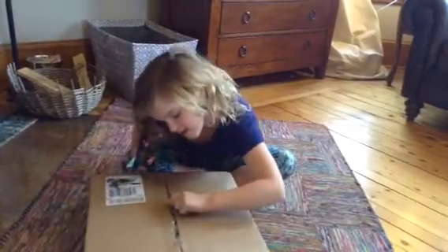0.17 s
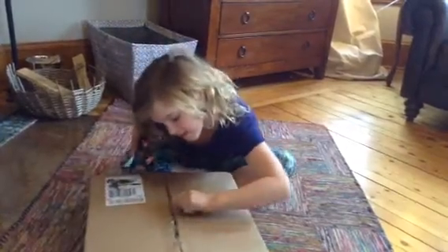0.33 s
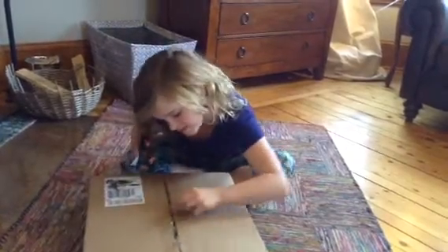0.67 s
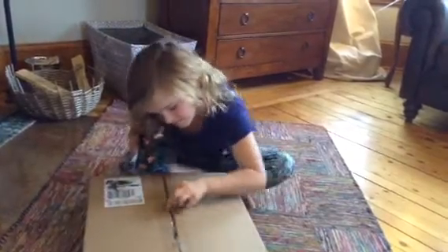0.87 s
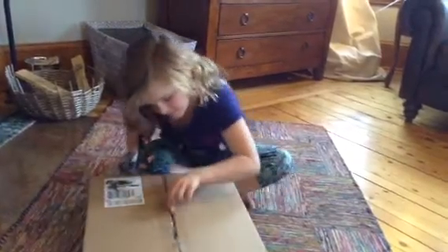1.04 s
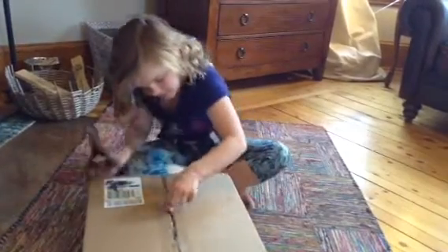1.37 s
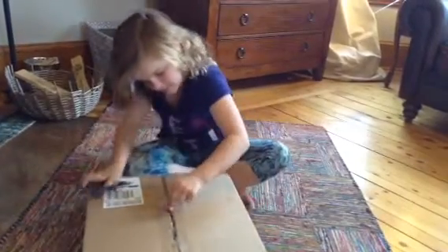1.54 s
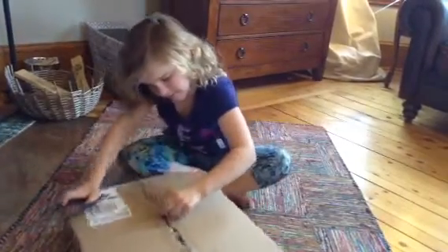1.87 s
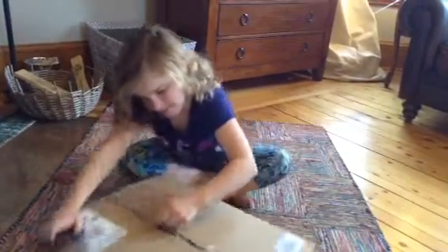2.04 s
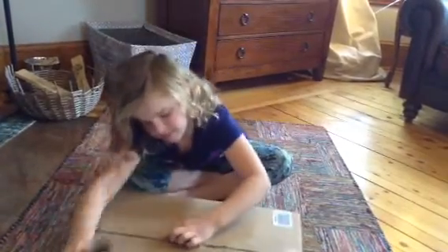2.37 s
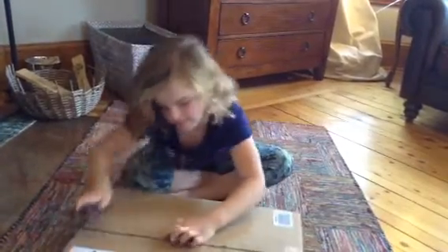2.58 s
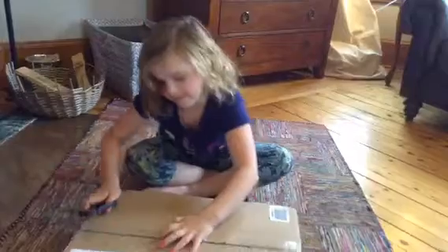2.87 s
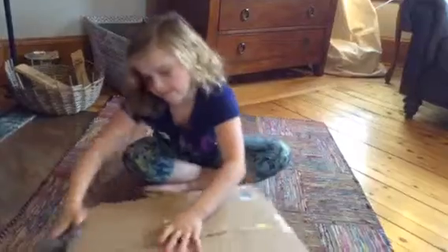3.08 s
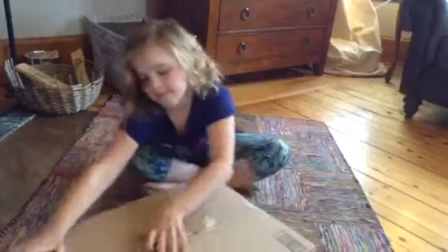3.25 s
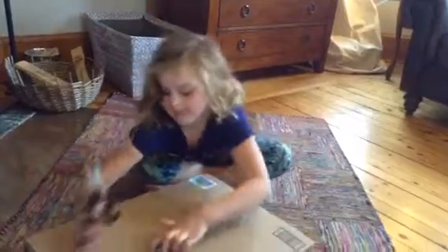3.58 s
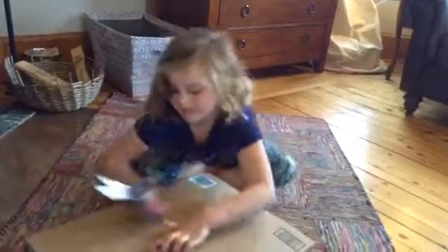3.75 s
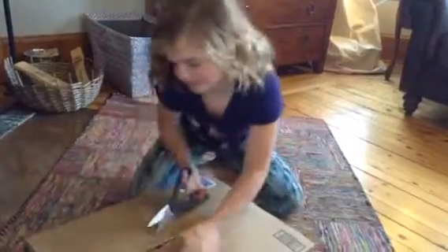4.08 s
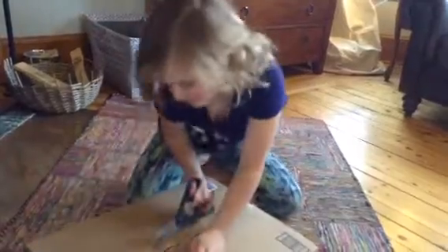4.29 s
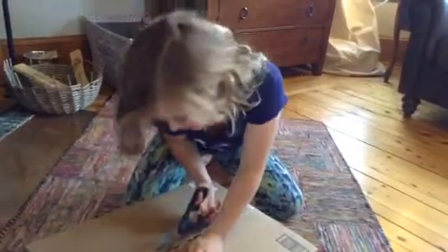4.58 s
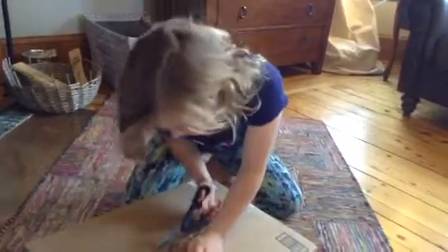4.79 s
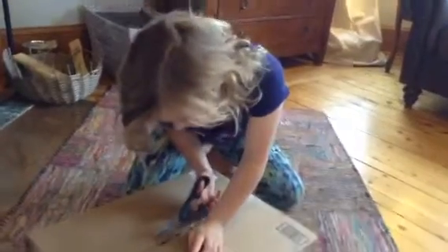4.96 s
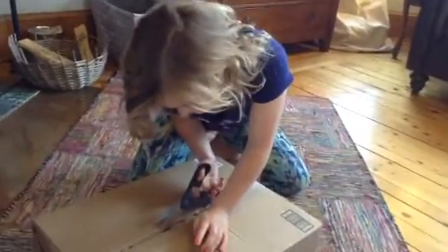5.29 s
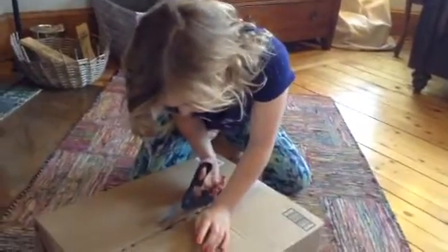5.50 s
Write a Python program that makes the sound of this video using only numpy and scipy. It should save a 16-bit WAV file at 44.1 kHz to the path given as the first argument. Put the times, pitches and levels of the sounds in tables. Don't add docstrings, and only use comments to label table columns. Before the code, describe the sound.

A faint, steady low hum lies under a quiet living room, heard close in mono with a short room tail. From 0 to 0.5 s fingers brush card, with thin bright tape snaps, the strongest near 0.38 s. Small ticks follow at 1.05-1.3 s. Hollow cardboard knocks at 1.5-1.7 s start a long hissing, scraping drag over the rug, fullest around 2 s, fading by 2.5 s. A cluster of bumps, a tiny squeak and a snap come at 2.6-2.7 s. A second drag swells from 2.9 to 3.8 s, dipping with a snap near 3.5 s. At 3.93 s comes the loudest event, a sharp crack with a boxy thump, then duller knocks, a faint squeak and short rubs until 4.3 s. From 4.4 s scissors make irregular dry ticks and crisp tape snaps, strong at 4.62 s, with a hollow knock at 4.89 s, ending on a bright snap and brief rub near 5.58 s.

```python
import sys
import numpy as np
from scipy import signal
from scipy.io import wavfile
from scipy.ndimage import uniform_filter1d

SR = 44100
rng = np.random.default_rng(int(sys.argv[2]) if len(sys.argv) > 2 else 0)


def makeup_ratio(level_db):
    decades = np.asarray(level_db, float) / 20
    return 10 ** decades


def master(y):
    cut = np.clip(np.atleast_2d(y).T, -1, 1)
    pcm = np.round(cut * 32767)
    wavfile.write(sys.argv[1], SR, pcm.astype(np.int16))


N = 248283


def rms_one(x):
    return x / np.sqrt(np.mean(x ** 2) + 1e-20)


def drift(rate_hz):
    hop = 40
    r = np.exp(-2 * np.pi * rate_hz * hop / SR)
    settle = 2000
    noise = rng.standard_normal(N // hop + 2 + settle)
    slow = signal.lfilter([1], [1, -2 * r, r * r], noise)[settle:]
    return np.interp(np.arange(N) / hop, np.arange(len(slow)), rms_one(slow))


def ring(push, hz, t60):
    r = makeup_ratio(-60 / (t60 * SR))
    w = 2 * np.pi * hz / SR
    return signal.lfilter([0, np.sin(w)], [1, -2 * r * np.cos(w), r * r], push + 1e-18)


def band(x, low_hz, high_hz, order=2):
    edges = [low_hz, min(high_hz, SR / 2.2)]
    return signal.sosfilt(signal.butter(order, edges, "band", fs=SR, output="sos"), x)


def coloured(sources, spectrum, patchy_db):
    hz, db = np.transpose(spectrum)
    bands = int(3 * np.log2(hz[-1] / hz[0])) + 1
    edges = np.geomspace(hz[0], hz[-1], bands + 1)
    out = np.zeros(N)
    for k, (low, high) in enumerate(zip(edges, edges[1:])):
        level_db = np.interp(np.log(low * high) / 2, np.log(hz), db)
        flicker_db = patchy_db * drift(13.3)
        out += makeup_ratio(level_db + flicker_db) * band(sources[k % 2], low, high)
    return rms_one(out)


def room_hum():
    # frequency in Hz, level in dB.
    hum_spectrum = [(20, -39), (45, -28), (75, -13.5), (148, -12.5), (190, 2.5), (300, -4.5), (370, -18),
                    (540, -22), (780, -35), (1150, -28), (1310, -23), (1500, -32), (4000, -33),
                    (15900, -62)]
    return makeup_ratio(-56) * coloured(rng.standard_normal((2, N)), hum_spectrum, patchy_db=0.44)


def contacts():
    # time in seconds, speed as hiss in dB,
    # weight as scrape in dB re hiss.
    pulls = [
        [(1.3, -73, 8), (1.46, -54, -9.5), (1.62, -63, -0.5), (1.74, -50, -2), (1.95, -39, -5.5),
         (2.33, -43, -2), (2.38, -50.5, -2), (2.5, -54, -5), (2.58, -68, 4)],
        [(2.84, -70, 2.5), (2.96, -44, -6), (3.1, -41, -6), (3.3, -41, -4.5), (3.46, -51, -5.5),
         (3.6, -41.5, -14.5), (3.68, -37.5, -13), (3.75, -40, -12), (3.81, -56, -2)],
        [(4.04, -86, -7), (4.13, -51, 0.5), (4.22, -47.5, -2.5), (4.41, -53.5, 1.3), (4.47, -64, 4.5),
         (4.52, -55.5, 2), (4.6, -56, -0.5), (4.7, -63.5, 4), (4.84, -74, 6.5)],
    ]
    # full strength at in seconds, held in seconds, hiss in dB,
    # weight in dB re hiss.
    brushes = [(0, 0.0032, -54.5, -2.5), (.31, 0.058, -49, -13), (.44, 0.083, -57.5, -5.5),
               (.885, 0.037, -56, -12.5), (1.06, .015, -66, 3.5), (2.59, 0.068, -61.5, 3),
               (3.83, 0.13, -61.5, -1.5), (5.31, 0.082, -66, -2)]
    # time in seconds, held in seconds, hiss in dB,
    # weight in dB re hiss, settling in dB per second.
    jolts = [(.359, 0.04, -48, -0.5, 180), (2.704, 0.017, -40, -14, 280), (2.705, 0.028, -58, 13, 114),
             (3.933, .004, -47, 2.5, 92), (4.893, .004, -66.5, 12, 49), (5.579, .06, -52.5, 2, 100)]
    t = np.arange(N) / SR
    for pull in pulls:
        s, db, weight_db = np.transpose(pull)
        yield np.interp(t, s, db, left=-120, right=-120), np.interp(t, s, weight_db)
    strokes = [(*row, 230, 286) for row in brushes] + [(*row, 2500) for row in jolts]
    for s, held, db, weight_db, fall, rise in strokes:
        before_s = np.maximum(s - t, 0)
        after_s = np.maximum(t - s - held, 0)
        yield np.maximum(db - rise * before_s - fall * after_s, -150), weight_db


def fibres(per_s, spread_db, grain_db):
    sizes = makeup_ratio(spread_db * np.minimum(rng.exponential(1, (2, N)), 5))
    sizes = sizes * rng.choice([-1, 1], (2, N))
    clicks = sizes * (rng.random((2, N)) < per_s / SR)
    return rng.standard_normal((2, N)) + makeup_ratio(grain_db) * rms_one(clicks)


def sliding():
    # hiss, scrape and rumble, each in dB.
    rest_db = [-69, -74, -66]
    # frequency in Hz, level in dB per Hz.
    fine_spectrum = [(3600, -24), (5000, -8), (6300, -8.5), (8300, -0.5), (10500, 1), (13000, -3),
                     (15900, 2)]
    coarse_spectrum = [(900, 5), (1400, 5), (2000, 3), (2900, 2), (4000, 0), (5200, -5.5), (7000, -4)]
    rumble_spectrum = [(130, -8), (190, -3), (280, -2), (400, -2), (580, -1), (800, -2), (1000, -2),
                       (1400, -5), (2100, -13)]
    power = makeup_ratio(2 * np.array(rest_db))[:, None] * np.ones(N)
    for db, weight_db in contacts():
        scrape_db = db + weight_db
        follow_db = np.minimum(0.7 * (scrape_db + 53), 2 * (scrape_db + 64))
        rumble_db = -56.5 + 0.38 * weight_db + follow_db
        power += makeup_ratio(2 * np.array([db, scrape_db, rumble_db]))
    fine, coarse, rumble = np.sqrt(power)
    contact = fibres(per_s=1800, spread_db=3.5, grain_db=-9.5) * makeup_ratio(0.53 * drift(7.2))
    out = fine * coloured(contact, fine_spectrum, patchy_db=1.5)
    out += coarse * coloured(contact, coarse_spectrum, patchy_db=2.3)
    return out + rumble * coloured(contact, rumble_spectrum, patchy_db=2.45)


def squeaks():
    # start in seconds, length in seconds, frequency in Hz, level in dB.
    squeak_events = [(0.366, 0.044, 1050, -51), (2.594, 0.013, 3710, -56), (2.63, 0.037, 2030, -52),
                     (4.017, 0.14, 2360, -54.5), (4.126, 0.02, 600, -47), (4.165, 0.016, 597, -52.5),
                     (4.21, 0.0089, 595, -45), (4.217, 0.082, 2140, -57.5)]
    out, t, noise = np.zeros(N), np.arange(N) / SR, rng.standard_normal(N)
    for s, length, hz, db in squeak_events:
        swell = np.sin(np.pi * np.clip((t - s) / length, 0, 1)) ** .5
        out += makeup_ratio(db) * swell * rms_one(ring(noise, hz, t60=.022))
    return out


def knocks():
    # time in seconds, peak in dB, boom in dB, favoured frequency in Hz, hardness in dB per octave.
    blows = [(.357, -57, -44.5, 1070, -6), (1.533, -25.5, -54, 354, -5), (1.639, -33.5, -37, 420, -3),
             (1.675, -26, -45, 910, 1), (2.447, -41.5, -52, 573, 1), (2.6236, -41.5, -55, 1520, 8),
             (2.698, -32, -62, 1100, -1), (2.715, -38, -46, 1000, 8), (3.477, -46, -59, 610, -1),
             (3.864, -51, -57, 510, -4), (3.915, -40, -38, 900, -4), (3.926, -23.5, -31.5, 770, 2),
             (3.994, -64, -36, 353, 3), (4.015, -41, -35.5, 369, -9), (4.034, -59, -46, 353, -12),
             (4.088, -50, -44, 476, 1.2), (4.122, -37.5, -49, 593, -1), (4.167, -41, -45, 584, -1),
             (4.21, -39, -40.5, 580, 6), (4.396, -39, -45, 604, 4), (4.563, -46, -68, 915, 7),
             (4.629, -44, -68, 1150, 7), (4.885, -33.5, -32, 1010, -1.5), (1.549, -35, -48, 405, -2.5)]
    # frequency in Hz, level in dB, t60 in seconds.
    wall_modes = [(331, -4, .09), (404, -6, .09), (502, -3, .09), (597, -2, .08), (675, -6, .06),
                  (760, 1, .03), (900, 2, .022), (998, -2, .04), (1146, 3, .018), (1300, 1, .03),
                  (1466, -4, .04), (1770, -2, .025), (2180, 2, .012), (2800, -3, .01)]
    # frequency in Hz, level in dB, t60 in seconds.
    cavity_modes = [(141, -37, 0.031), (192.4, -3, 0.18), (216, 8, 0.15), (285, 9.5, 0.08)]
    size = 16384
    out = np.zeros(N + size)
    t = np.arange(size) / SR
    for s, peak_db, boom_db, spot_hz, tilt_db in blows:
        share = max(0.43 - 0.08 * (peak_db + 29), .2)
        clumps = makeup_ratio(3.5 * np.repeat(rng.standard_normal(size // 128), 128))
        push = 0.057 * rng.standard_normal(size) * clumps * makeup_ratio(-60 * t / (0.09 * share))
        push[0] = -1
        body = np.zeros(size)
        for hz, db, t60 in wall_modes:
            spot_db = 8 * np.exp(-(np.log2(hz / spot_hz) / .3) ** 2)
            mode_db = db + rng.normal(0, 1.5) + spot_db + tilt_db * np.log2(hz / 700)
            body += makeup_ratio(mode_db) * ring(push, hz, t60 * share)
        squeeze = signal.lfilter(*signal.butter(2, 400, fs=SR), push * makeup_ratio(-60 * t / 0.0058))
        boom = np.zeros(size)
        for hz, db, t60 in cavity_modes:
            boom += makeup_ratio(db + rng.normal(0, 1.5)) * ring(squeeze, hz, t60)
        at = round((s + .0018) * SR)
        out[at:at + size] += makeup_ratio(peak_db) * body / np.abs(body).max()
        out[at:at + size] += makeup_ratio(boom_db - 3.0) * boom / np.abs(boom).max()
    return out[:N]


def snaps():
    # time in seconds, peak in dB, centre in Hz, dull part in dB re peak.
    tape = [(0.243, -34, 13300, -26), (0.2715, -36, 9260, -30), (0.2864, -29, 9000, -31),
            (0.3433, -21, 12200, -32), (0.383, -16, 12300, -14.5), (0.5126, -32, 11700, -33),
            (1.052, -38, 11200, -27), (1.063, -35, 12300, -12.5), (1.16, -42.5, 9860, -10),
            (1.301, -37, 8200, -17), (2.7, -23, 8200, -18), (3.479, -22, 13500, -28),
            (3.9164, -11.5, 12400, -18), (3.9276, -1.4, 8300, -30), (4.3963, -23, 11100, -14),
            (4.5155, -29.5, 11900, -8), (4.525, -35, 6370, -20), (4.5394, -27, 8070, -21),
            (4.6094, -31, 10600, -24), (4.622, -12.5, 13100, -18), (4.9375, -16.5, 11600, -16),
            (5.1285, -38, 13100, -12), (5.3185, -22, 10400, -24), (5.3228, -19.5, 10000, -19),
            (5.4036, -40.5, 8050, -11), (5.44, -28, 10600, -37), (5.452, -33, 9160, -17),
            (5.4645, -30, 10800, -24), (5.532, -29, 13300, -10), (5.576, -9.5, 11100, -15)]
    # time in seconds, peak in dB, centre in Hz,
    # dull part in dB re peak.
    ticks = [(0.0938, -46.5, 1960, 1.2), (0.3581, -19, 2640, -13), (1.2224, -54, 2860, -4),
             (1.532, -32.5, 1830, -15.5), (1.676, -27.5, 1990, 5), (2.6251, -29, 3200, -1.5),
             (3.865, -39, 3420, 9.5), (3.9424, -38, 3470, -16), (4.087, -32.5, 2370, -4),
             (4.4383, -31, 3190, -9), (4.558, -25, 2170, -11), (4.5637, -25.5, 1740, -9),
             (4.577, -42, 1960, -13), (4.6295, -23, 4100, -9), (4.6597, -30.5, 1500, -2.5),
             (4.7311, -31.5, 3960, -3.5), (4.769, -27.5, 1800, -10), (4.797, -41, 3070, -5),
             (4.8884, -26, 2350, -1), (4.8917, -21.5, 1910, -22), (5.0225, -40, 2430, -1.5),
             (5.0528, -40.5, 2030, -2.5), (5.1523, -26.5, 3800, -5), (5.1728, -37, 3820, -7),
             (5.2832, -43, 2560, -9), (5.3292, -25, 4170, -4), (5.4977, -39, 2070, -11),
             (5.5427, -29, 4140, -6)]
    size = 8192
    out = np.zeros(N + size)
    t = np.arange(size) / SR
    fall = makeup_ratio(-60 * t / 0.011)
    rows = [(*row, -29) for row in tape] + [(*row, -18) for row in ticks]
    for s, peak_db, hz, dull_db, tail_db in rows:
        tail_db -= 0.13 * (peak_db + 22)
        noise = rng.standard_normal((3, size))
        noise *= makeup_ratio(5.0 * np.repeat(rng.standard_normal(size // 32), 32))
        noise[:2, 0] = -11 * makeup_ratio(0.22 * peak_db)
        bright_hz, dull_hz = (hz, 3000) if hz > 5000 else (9000, hz)
        bright = band(noise[0] * fall, bright_hz / 1.51, bright_hz * 1.65)
        dull = band(noise[1] * fall, dull_hz / 1.62, dull_hz * 1.29)
        bright_gain = np.sqrt(np.clip(1 - makeup_ratio(2 * dull_db), .003, 1))
        snap = bright_gain * bright / np.abs(bright).max()
        snap += makeup_ratio(dull_db) * dull / np.abs(dull).max()
        tail = band(noise[2], hz / 22.0, hz * 2.1, order=1) * makeup_ratio(tail_db - 60 * t / 0.081)
        at = round((s + .001) * SR)
        out[at:at + size] += makeup_ratio(peak_db) * (snap + tail)
    return out[:N]


def room(x):
    t60, wall_cut_hz, first_echo_s = 0.34, 2140, 0.0028
    t = np.arange(SR // 2) / SR
    noise = rng.standard_normal((2, len(t)))
    dull = signal.lfilter(*signal.butter(1, wall_cut_hz, fs=SR), noise[0]) * makeup_ratio(-60 * t / t60)
    bright = 0.21 * noise[1] * makeup_ratio(-60 * t / (0.77 * t60))
    echoes = (dull + bright) * (t > first_echo_s)
    return signal.fftconvolve(x, echoes / np.sqrt(np.sum(echoes ** 2)))[:N]


def scene():
    hits = makeup_ratio(-1.5) * snaps() + makeup_ratio(6.5) * knocks()
    hits = signal.sosfilt(signal.butter(3, 145, "high", fs=SR, output="sos"), hits)
    mono = room_hum() + sliding() + squeaks() + hits + makeup_ratio(-9.5) * room(hits)
    return np.array([mono, mono])


def low_pass(x):
    return signal.sosfilt(signal.butter(12, 16630, fs=SR, output="sos"), x)


def record(dry):
    ceiling = .95
    held = ceiling * np.tanh(dry / ceiling)
    kept = signal.sosfiltfilt(signal.ellip(10, .3, 60, 15300, fs=SR, output="sos"), held)
    loud = np.clip(uniform_filter1d(np.abs(held), size=128) / makeup_ratio(-20), 0, 1) ** 2
    top = signal.sosfiltfilt(signal.ellip(8, .3, 50, 16500, fs=SR, output="sos"), loud * (held - kept))
    return low_pass(kept + makeup_ratio(-10) * top)


dry = scene()
out = record(dry)
master(out)
```